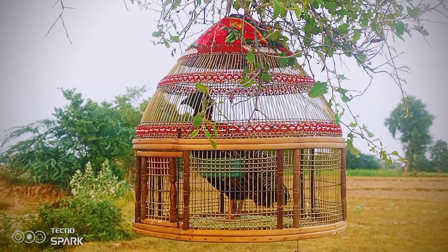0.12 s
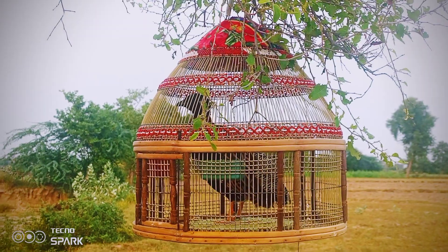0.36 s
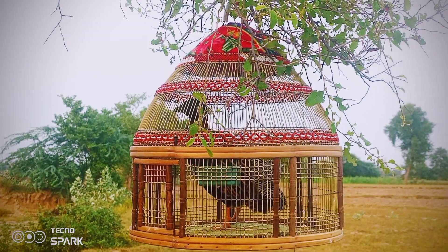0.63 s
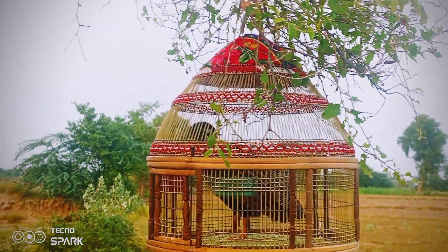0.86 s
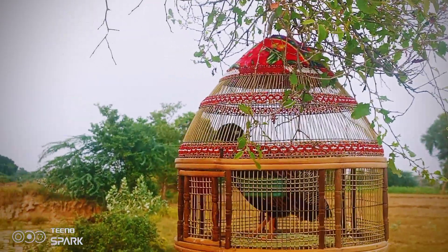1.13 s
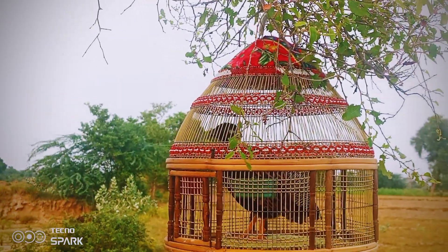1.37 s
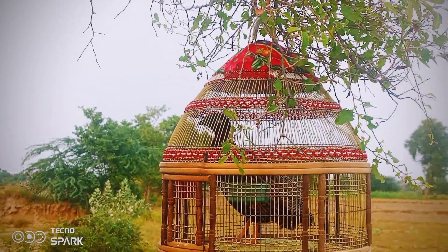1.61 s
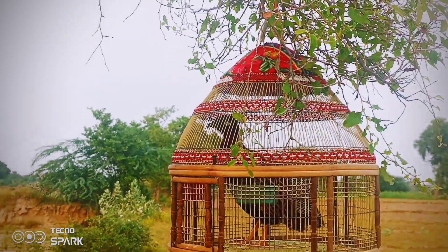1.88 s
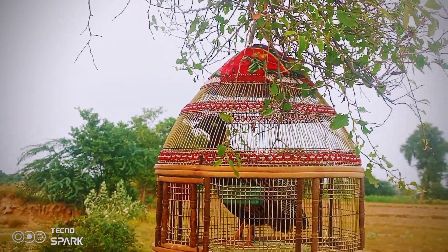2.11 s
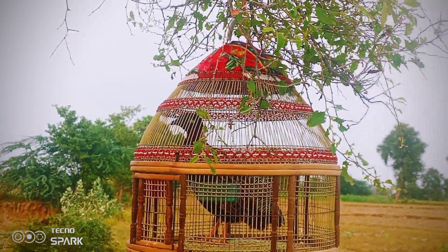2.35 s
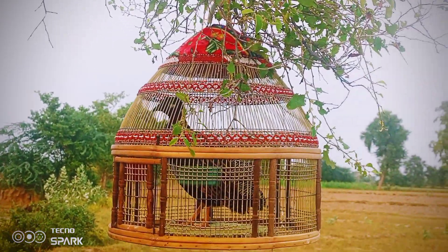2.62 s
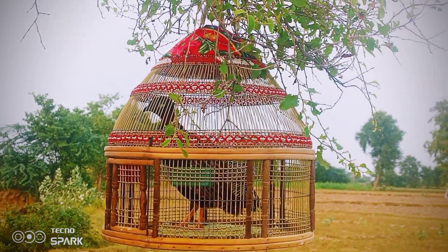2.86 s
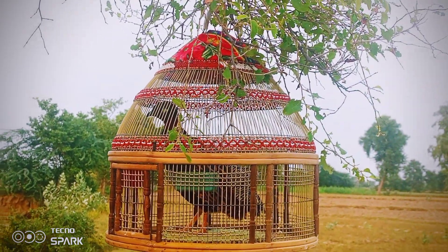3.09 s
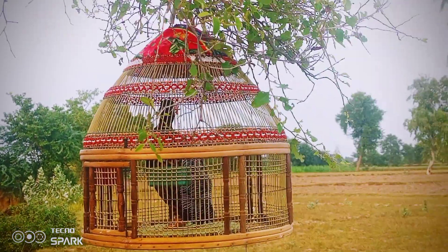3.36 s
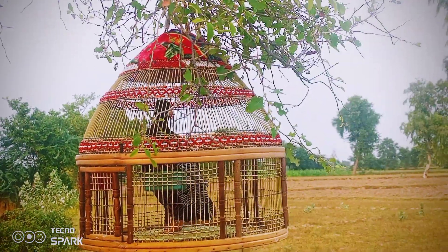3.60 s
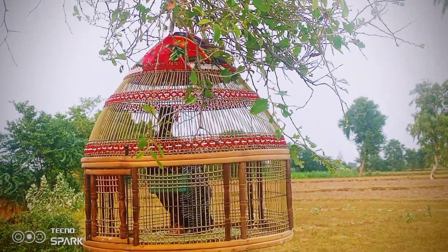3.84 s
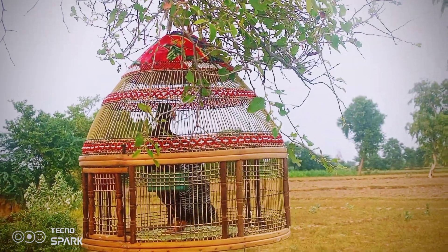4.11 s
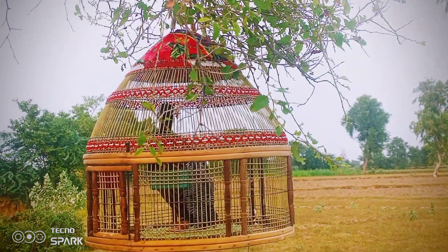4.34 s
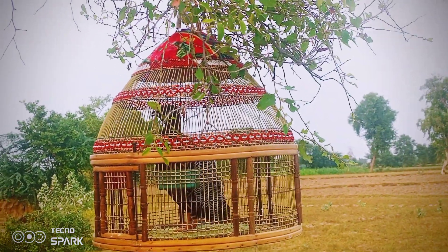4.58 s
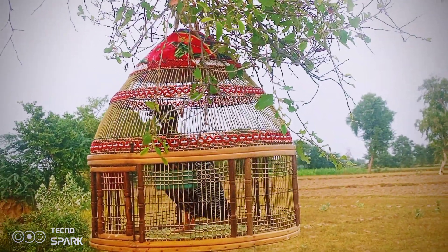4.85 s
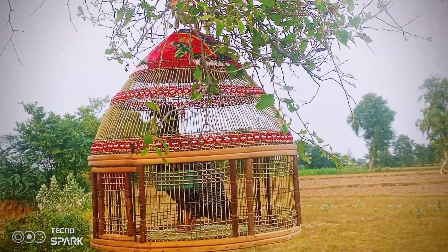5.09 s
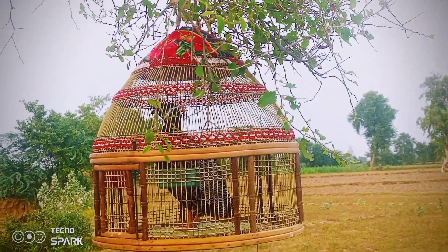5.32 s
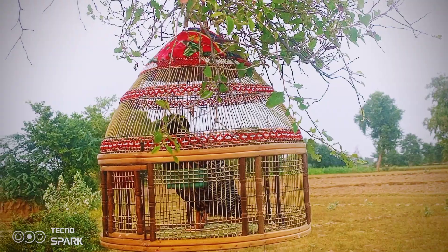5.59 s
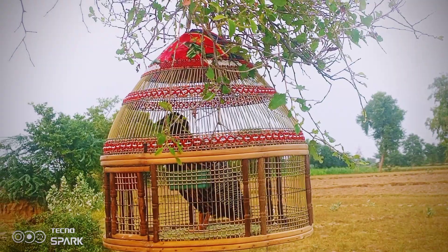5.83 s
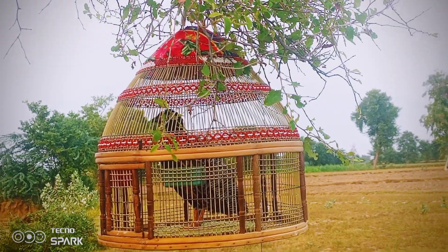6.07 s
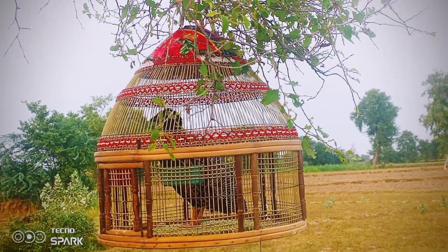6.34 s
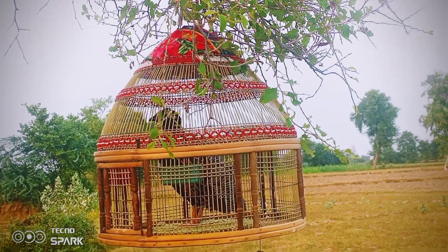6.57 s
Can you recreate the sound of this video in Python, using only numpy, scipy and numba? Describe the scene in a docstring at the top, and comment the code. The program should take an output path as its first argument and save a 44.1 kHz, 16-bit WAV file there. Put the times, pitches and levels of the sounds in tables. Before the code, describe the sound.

Open farmland, very quiet: low field hush, light wind rumble, a faint insect shimmer, distant chirps and soft dove coos. Just after three seconds a caged game bird close to the microphone gives four loud, grating notes in about one second, the second and fourth cracking into a tiny high whistle. Then the quiet returns, with a far bird repeating a hoarse falling note.

```python
"""Caged game bird in open farmland

One microphone, the caged bird close by: four loud scratchy notes, two breaking into a short whistle.
The notes are a throttled tone with snaps ringing the throat; cage, leaves and a far tree line return them.
Around them: a small rasp and ticks, faint gliding tones for distant birds, a dove's swelling coos,
and filtered noise for insects, light wind and field hush."""
import sys
import numpy as np
from scipy import signal
from scipy.fft import rfft, irfft
from scipy.io import wavfile
from scipy.ndimage import uniform_filter1d, minimum_filter1d
from numba import njit

SR = 44100
rng = np.random.default_rng(int(sys.argv[2]) if len(sys.argv) > 2 else 0)


def persist_wave(psi):
    """Save psi, clipped to +-1, as 16-bit WAV."""
    counts = np.round(np.clip(psi, -1, 1) * 32767).astype(np.int16)
    wavfile.write(sys.argv[1], SR, np.atleast_2d(counts).T)


def convert_level_to_amplitude(level_db):
    """Map a level in decibels to its linear amplitude factor."""
    exponent = np.asarray(level_db, float) / 20
    return 10 ** exponent


N = 295470

# Puffs of air through the close bird's syrinx, spectrum only, with the microphone lifting the treble above 14
# kHz: (frequency # [Hz], relative level [dB])
RASP_COLOUR = [(1500, -64), (2300, -38), (3200, -8.5), (4000, -13), (4600, -15.5), (5600, -17.5),
               (7100, -24.5), (7500, -32.5), (9900, -36.5), (11400, -43), (12000, -51.5), (13900, -52),
               (14700, -42), (15800, -41.5)]
# Band levels [dB re main tone]: the two below fade as the beak opens, the upper swells through the note
LOW_SHUT_DB, LOW_OPEN_DB, BEAK_SHUT_DB, BEAK_OPEN_DB = -6, -41, -3, -22.5
UPPER_START_DB, UPPER_END_DB, THIRD_DB, RASP_DB = -14, -4.5, -15, -2
# Throat resonances: centre and width [Hz]
LOW_HZ, LOW_WIDTH_HZ = 1600, 170
BEAK_SHUT_HZ, BEAK_OPEN_HZ, BEAK_WIDTH_HZ = 2200, 2850, 480
UPPER_START_HZ, UPPER_END_HZ, UPPER_WIDTH_HZ = 5150, 5650, 580
THIRD_HZ, THIRD_WIDTH_HZ = 4900, 250


def scratchy_note(rows):
    """A syrinx tone is throttled, strong and weak by turns; each throb snaps, rings the throat and puffs air."""
    at, (db, hz, per_s, opening), gate = piece(rows, fade_s=0.0031)
    n, opening = len(at), np.clip(opening, 0, 1)
    throb = turns(per_s * (1 + .022 * wander(40, size=n))) - .3
    strength = convert_level_to_amplitude(1.8 * np.cos(throb / 2) + .6 * wander(90, size=n))  # every other throb is weaker
    carrier = np.sin(turns(hz + 32 * wander(120, size=n)) + .4 * np.sin(throb))
    tone = (1 - .6 * np.cos(throb)) * strength * carrier

    snaps = np.diff(np.floor(throb / (2 * np.pi)), prepend=-1) * strength  # one click per throb
    breath = .035 * rng.standard_normal(n) * (1 - .4 * np.cos(throb - 1))
    beak_hz = BEAK_SHUT_HZ + (BEAK_OPEN_HZ - BEAK_SHUT_HZ) * opening
    beak = throat(snaps + breath, beak_hz, BEAK_WIDTH_HZ)
    upper = throat(snaps + 2 * breath, np.linspace(UPPER_START_HZ, UPPER_END_HZ, n), UPPER_WIDTH_HZ)
    third = throat(snaps + breath, THIRD_HZ, THIRD_WIDTH_HZ)
    low = throat(snaps + 2 * breath, LOW_HZ, LOW_WIDTH_HZ)

    rasp = np.zeros(n)
    turn = np.linspace(0, 5, n)  # six puff shapes, each fading into the next
    for k in range(6):
        shape = coloured(RASP_COLOUR, size=400) * np.hanning(400)
        puff = signal.fftconvolve(snaps + breath, shape)[150:n + 150]
        rasp += puff * np.cos(np.pi / 2 * np.clip(turn - k, -1, 1))

    beak_level = convert_level_to_amplitude(BEAK_SHUT_DB + (BEAK_OPEN_DB - BEAK_SHUT_DB) * opening)
    low_level = convert_level_to_amplitude(LOW_SHUT_DB + (LOW_OPEN_DB - LOW_SHUT_DB) * opening ** 1.1)
    below = beak_level * beak + low_level * low
    above = convert_level_to_amplitude(np.linspace(UPPER_START_DB, UPPER_END_DB, n)) * upper + convert_level_to_amplitude(THIRD_DB) * third
    return at, gate * convert_level_to_amplitude(db) * (rms_one(tone) + below + above + convert_level_to_amplitude(RASP_DB) * rms_one(rasp))


def throat(x, hz, width_hz):
    """A resonance rung twice (slow rise, dark valleys), its slow level evened out to rms 1."""
    one = np.ones(len(x))
    r = np.exp(-np.pi * width_hz / SR) * one
    c = np.cos(2 * np.pi * hz / SR) * one
    y = resonate(resonate(x, r, c), r, c)
    return y / np.sqrt(uniform_filter1d(y ** 2, size=700) + 1e-14)


@njit
def resonate(x, r, c):
    """Two-pole resonance whose centre and width move sample by sample."""
    y = np.zeros(len(x))
    for i in range(2, len(x)):
        y[i] = (1 - r[i]) * x[i] + 2 * r[i] * c[i] * y[i - 1] - r[i] ** 2 * y[i - 2]
    return y


def whistle(rows, depth, octave_db=-33):
    """The snapping stops and one clear, beating tone with a faint octave is left."""
    at, (hz, db), gate = piece(rows, fade_s=0.002)
    n = len(at)
    swing = turns(hz + 12 * wander(200, size=n))
    beat = 1 + depth * np.cos(turns(400 * (1 + .15 * wander(60, size=n))))  # about 400 beats per s
    tone = np.sin(swing) + convert_level_to_amplitude(octave_db) * np.sin(2 * swing)
    return at, np.sqrt(2) * gate * beat * convert_level_to_amplitude(db + 1.9 * wander(150, size=n)) * tone


# Scratchy notes of the close bird, in pieces:
# (time [s], main tone level [dB], main tone [Hz], throbs [per s], beak opening [0-1])
NOTES = [
    [(3.319, -28, 3070, 260, 0.6), (3.325, -20.5, 3124, 260, 0.84), (3.381, -18.5, 3248, 260, .85),
     (3.433, -17, 3455, 221, 1.0), (3.457, -22.5, 3220, 221, 0.61), (3.468, -23.5, 3380, 221, 0.21)],
    [(3.662, -26.5, 3247, 279, .0), (3.672, -21.5, 3332, 280, 0.31), (3.712, -18.5, 3071, 252, 1),
     (3.826, -20, 3262, 266, 0.63), (3.844, -20.5, 3370, 263, 0.73), (3.852, -25.5, 3520, 300, 1)],
    [(3.874, -19, 3130, 190, 0.18), (3.882, -26.5, 3370, 190, 0.3), (3.89, -25.5, 3110, 190, 0.28),
     (3.905, -30.5, 3173, 190, 0.5)],
    [(4.139, -29, 3320, 268, 0), (4.149, -21.5, 3310, 272, 0.39), (4.181, -18.5, 3218, 268, 0.9),
     (4.227, -18.5, 3125, 240, 0.99), (4.258, -25, 3340, 225, .15)],
    [(4.334, -27, 3170, 276, .0), (4.344, -19.5, 3330, 276, 0.38), (4.36, -17.5, 3255, 280, 0.7),
     (4.414, -22, 3080, 284, 0.88), (4.42, -19, 3100, 283, .45)],
    [(4.443, -21, 3110, 217, 1), (4.447, -20, 3333, 217, 0.61), (4.477, -22.5, 3226, 240, 0.35),
     (4.498, -29, 3200, 221, 0.26)],
]
# Breaks into whistling: (time [s], frequency [Hz], level [dB])
WHISTLES = [
    [(3.847, 5485, -23), (3.853, 5700, -16.5), (3.864, 5730, -16.5), (3.872, 5520, -16.5),
     (3.876, 5360, -29.5)],
    [(4.415, 5430, -24), (4.421, 5640, -19), (4.427, 6050, -23), (4.432, 5940, -21), (4.437, 5760, -20),
     (4.442, 5440, -17.5), (4.445, 5430, -27)],
]
# Beating of each whistle: depth [share of the level]
WHISTLE_BEAT_DEPTHS = [.1, .6]
CALL_EDGE_HZ = 1460


def game_bird():
    """All notes and whistle breaks of the close bird; little sounds below the low band."""
    sounds = [scratchy_note(rows) for rows in NOTES]
    sounds += [whistle(rows, depth) for rows, depth in zip(WHISTLES, WHISTLE_BEAT_DEPTHS)]
    out = np.zeros(N)
    for at, sound in sounds:
        out[at] += sound
    return signal.sosfilt(signal.ellip(5, 1, 45, CALL_EDGE_HZ, "high", fs=SR, output="sos"), out)


# Levels are the energy of each response [dB re the direct call]
SCATTER_DB, SCATTER_T60_S = -10, 0.21
ECHO_DB, ECHO_LAG_S, ECHO_SMEAR_S, ECHO_TREES_PER_S = -42.5, .21, 0.022, 400
FIELD_DB, FIELD_T60_S = -47.5, 1.0


def surroundings(x):
    """Quick scatter off cage and leaves, one smeared echo from far trees, a faint long tail over the field."""
    t = np.arange(SR) / SR
    noise = rng.standard_normal((3, SR))
    near = band(noise[0], 2600, 14000, order=1) * convert_level_to_amplitude(-60 * t / SCATTER_T60_S) * (t > .002)
    trees = noise[1] * (rng.random(SR) < ECHO_TREES_PER_S / SR)  # separate reflections
    echo = band(trees, 2500, 6235) * np.exp(-.5 * ((t - ECHO_LAG_S) / ECHO_SMEAR_S) ** 2)
    field = band(noise[2], 2100, 6400) * convert_level_to_amplitude(-60 * t / FIELD_T60_S) * np.clip(t / 0.043, 0, 1)
    response = convert_level_to_amplitude(SCATTER_DB) * unit_energy(near) + convert_level_to_amplitude(ECHO_DB) * unit_energy(echo)
    response = response + convert_level_to_amplitude(FIELD_DB) * unit_energy(field)
    return signal.fftconvolve(x, response)[:N]


# Colour of the dry rasp nearby, spectrum only: (frequency [Hz], relative level [dB])
CHURR_COLOUR = [(1060, -43), (1800, -24), (2270, 7), (2630, 7.5), (3420, -4), (3830, 7), (4680, 9),
                (5940, 3), (7000, -16), (9100, -56), (15400, -120)]
CHURR_AT_S, CHURR_HOLD_S, CHURR_DB = .555, 0.071, -65.5
CHURR_RISE_DB_PER_S, CHURR_FALL_DB_PER_S = 2100, 1650


def churr():
    """A short dry rasp nearby: coloured noise with an uneven level and steep ends."""
    at = np.arange(round((CHURR_AT_S - .015) * SR), round((CHURR_AT_S + CHURR_HOLD_S + .03) * SR))
    t = at / SR - CHURR_AT_S
    rise = CHURR_RISE_DB_PER_S * np.minimum(t, 0)
    fall = CHURR_FALL_DB_PER_S * np.maximum(t - CHURR_HOLD_S, 0)
    level = convert_level_to_amplitude(CHURR_DB + rise - fall + 4.2 * wander(120, size=len(at)))
    out = np.zeros(N)
    out[at] = level * coloured(CHURR_COLOUR, size=len(at))
    return out


# Small dry ticks: (time [s], peak level [dB], frequency [Hz])
TICKS = [(0.2, -55, 1100), (0.51, -60, 5040), (0.618, -56, 2780), (3.21, -48.5, 1590), (5.836, -60, 3700)]


def ticks():
    """Broad dry ticks: short bursts of noise that die away at once."""
    out = np.zeros(N)
    t = np.arange(400) / SR
    for s, peak_db, hz in TICKS:
        burst = rng.standard_normal(400) * convert_level_to_amplitude(-60 * t / 0.011)
        puff = band(burst, hz / 1.6, hz * 1.3, order=3)
        out[round(s * SR):][:400] += convert_level_to_amplitude(peak_db) * puff / np.abs(puff).max()
    return out


# A warbling whistle far off, at full strength: (time [s], frequency [Hz], level [dB])
WARBLE = [(0.11, 1700, -72), (0.14, 1940, -56), (0.17, 2045, -54), (0.24, 2038, -55.5),
          (0.272, 1926, -58.5), (0.328, 1964, -56), (0.376, 1815, -64), (0.41, 1920, -76)]
WARBLES_PER_S = 84


def warble(swing_hz=78.0, second_ratio=1.236, second_db=-15):
    """A tone with fast vibrato and a weaker second voice above it."""
    at, (hz, db), gate = piece(WARBLE, fade_s=0.0072)
    n = len(at)
    beat = 2 * np.pi * WARBLES_PER_S * (at - at[0]) / SR
    pitch = hz + swing_hz * np.sin(beat)
    second = np.sin(turns(second_ratio * pitch + 60. * wander(106, size=n)))
    level = convert_level_to_amplitude(db + 0.71 * np.cos(beat) + 2.0 * wander(40, size=n))
    out = np.zeros(N)
    out[at] = np.sqrt(2) * gate * level * (np.sin(turns(pitch)) + convert_level_to_amplitude(second_db) * second)
    return out


# A far bird chattering in calls of several parts: (start [s], length [s], peak level [dB])
CHATTER = [(1.133, 0.031, -68.5), (1.201, 0.025, -66.5), (1.287, 0.029, -63), (1.376, .056, -67.5),
           (1.485, .05, -67.5), (1.59, 0.052, -67), (1.709, 0.034, -66.5), (1.845, 0.049, -69)]
# Parts of one call:
# (lag [s], share of the length [1], first pitch [Hz], last pitch [Hz], level [dB re call], hoarseness [Hz])
CHATTER_PARTS = [(0.00073, 1.06, 2790, 2680, 0, 116), (.007, 1.12, 1980, 2210, -0.5, 140),
                 (.005, .95, 6080, 6060, -16.5, 150.)]
# Another far bird repeating one hoarse falling note: (start [s], peak level [dB])
CACKLE = [(5.416, -64), (5.511, -68.5), (5.601, -68), (5.711, -65.5), (5.812, -65), (5.928, -65),
          (6.051, -68.5)]
CACKLE_S, CACKLE_FIRST_HZ, CACKLE_LAST_HZ, CACKLE_HOARSE_HZ = 0.0595, 2560, 2090, 90.
# Clear far peeps: (start [s], length [s], first pitch [Hz], last pitch [Hz], peak level [dB])
PEEPS = [(.0, .092, 4700, 4400, -80), (.044, .071, 5300, 4970, -82), (.19, 0.062, 5450, 5500, -80),
         (.773, .05, 4750, 4700, -86), (.84, .065, 4600, 4470, -89), (.0, 0.074, 2300, 2270, -75),
         (0.084, 0.07, 3980, 3810, -79), (.776, 0.096, 2370, 2310, -70.5), (1.36, .046, 3920, 3720, -77),
         (1.398, 0.022, 3530, 3330, -74), (1.797, 0.049, 3700, 4300, -81), (1.995, 0.13, 4750, 5050, -82),
         (2.123, 0.068, 3780, 4150, -81), (2.334, 0.11, 1860, 1960, -75), (2.372, 0.093, 2740, 2650, -70.5),
         (2.517, 0.23, 2710, 2700, -80), (2.926, 0.12, 2680, 2460, -73), (3.21, .052, 3930, 3750, -74),
         (4.747, .06, 1920, 1960, -68.5), (5.181, 0.044, 3950, 4040, -65.5), (6.161, 0.24, 2385, 2420, -70)]
# Hoarse far chirps: (start [s], length [s], first pitch [Hz], last pitch [Hz], peak level [dB])
CHIRRUPS = [(.024, .036, 5800, 5600, -74.5), (0.48, 0.022, 6100, 5900, -67.5),
            (0.47, 0.061, 2900, 2920, -71.5), (.856, 0.26, 1810, 1820, -67.5),
            (1.287, 0.069, 5940, 5000, -77), (2.417, 0.046, 5950, 5530, -65),
            (2.444, 0.04, 5450, 5820, -63), (2.587, .053, 5800, 5830, -72),
            (3.142, .056, 1930, 2020, -66.5), (3.215, 0.025, 6000, 6000, -71),
            (5.1, 0.063, 6250, 5150, -80), (5.31, .073, 1950, 2350, -68.5), (6.347, .033, 6000, 5300, -82)]
PEEP_HOARSE_HZ, CHIRRUP_HOARSE_HZ = 35., 119.8
# Barely heard peeps at random moments
TWITTERS, TWITTER_DB, TWITTER_S, TWITTER_LOW_HZ, TWITTER_HIGH_HZ = 8, -86, .055, 3800, 5600


def far_notes():
    """Every far note: (start [s], length [s], first pitch [Hz], last pitch [Hz], peak [dB], hoarseness [Hz])."""
    notes = []
    for s, length, db in CHATTER:
        for lag, share, first_hz, last_hz, part_db, hoarse_hz in CHATTER_PARTS:
            notes.append((s + lag, length * share, first_hz, last_hz, db + part_db, hoarse_hz))
    for s, db in CACKLE:
        notes.append((s, CACKLE_S, CACKLE_FIRST_HZ, CACKLE_LAST_HZ, db, CACKLE_HOARSE_HZ))
    notes += [(*row, PEEP_HOARSE_HZ) for row in PEEPS]
    notes += [(*row, CHIRRUP_HOARSE_HZ) for row in CHIRRUPS]
    for when, high, glide in rng.random((TWITTERS, 3)):
        start = when * (N / SR - 2 * TWITTER_S)
        hz = TWITTER_LOW_HZ + (TWITTER_HIGH_HZ - TWITTER_LOW_HZ) * high
        notes.append((start, TWITTER_S, hz, hz * (.94 + .08 * glide), TWITTER_DB, PEEP_HOARSE_HZ))
    return notes


def far_birds():
    """Gliding tones; distance and hoarseness make pitch and level shake."""
    out = np.zeros(N)
    for s, length, first_hz, last_hz, db, hoarse_hz in far_notes():
        i, n = round(max(s, 0) * SR), round(length * SR)
        pitch = np.linspace(first_hz, last_hz, n) + hoarse_hz * wander(181, size=n)
        level = convert_level_to_amplitude(db + 0.82 * wander(80, size=n)) * np.sqrt(np.hanning(n))
        out[i:i + n] += level * np.sin(turns(pitch))
    return out


def far_tail(x, tail_db=-14, t60_s=0.25):
    """Far calls arrive with a dull wash of scatter behind them."""
    t = np.arange(SR // 2) / SR
    wash = band(rng.standard_normal(SR // 2), 1200, 7000, order=1) * convert_level_to_amplitude(-60 * t / t60_s)
    return x + convert_level_to_amplitude(tail_db) * signal.fftconvolve(x, unit_energy(wash))[:N]


# Coos of the dove: (middle [s], length [s], level at the top of the swell [dB])
DOVE = [(0.056, 0.1, -80), (.29, 0.074, -76.5), (0.446, 0.091, -66.5), (0.576, 0.15, -63.5),
        (0.717, 0.052, -84), (0.86, 0.12, -76), (0.978, 0.1, -65.5), (1.49, .15, -81), (1.648, 0.1, -91),
        (1.913, .18, -86), (2.93, 0.084, -87)]
DOVE_HZ = 489
DOVE_FAR_DB, DOVE_FAR_UNTIL_S = -85.5, 3  # a steady faint murmur on the same pitch


def dove():
    """Soft coos on one pitch, each a smooth swell, over a faint murmur."""
    t = np.arange(N) / SR
    level = convert_level_to_amplitude(DOVE_FAR_DB + 3. * wander(6, size=N)) * np.clip((DOVE_FAR_UNTIL_S - t) / .1, 0, 1)
    for s, length, db in DOVE:
        level = level + convert_level_to_amplitude(db) * np.cos(np.pi * np.clip((t - s) / length, -.5, .5)) ** 2
    return np.sqrt(2) * level * np.sin(turns(DOVE_HZ + 4.8 * wander(13.3, size=N)))


# Insect bouts that swell and break off: (start [s], end [s], level at the end [dB])
INSECTS = [(.3, 0.872, -85.5), (1.1, 1.853, -87.5), (2.1, 2.868, -85), (4.663, 4.98, -85.5),
           (5.2, 5.98, -90), (6.05, 6.5, -96)]
INSECT_HZ, INSECT_WIDTH_HZ = 7450, 380
INSECT_SWELL_DB, INSECT_REST_DB = 7, -101


def insects():
    """A narrow shimmering band of noise; each bout swells, then stops short."""
    t = np.arange(N) / SR
    level = convert_level_to_amplitude(INSECT_REST_DB)
    for start, end, db in INSECTS:
        gate = np.clip(np.minimum((t - start) / .1, (end - t) / 0.021), 0, 1)
        time_left = np.clip((end - t) / (end - start), 0, 1)  # share of the bout
        level = level + gate * convert_level_to_amplitude(db - INSECT_SWELL_DB * time_left)
    low_hz, high_hz = INSECT_HZ - INSECT_WIDTH_HZ / 2, INSECT_HZ + INSECT_WIDTH_HZ / 2
    hiss = band(rng.standard_normal(N), low_hz, high_hz)
    return level * convert_level_to_amplitude(2.2 * wander(30, size=N)) * rms_one(hiss)


# Wind on the microphone: (time [s], level [dB])
WIND = [(.0, -75), (.97, -72), (1.2, -74), (1.65, -76), (1.82, -73), (2.0, -77), (3.2, -76), (4.55, -77.5),
        (4.77, -66.5), (5.4, -69.5), (5.5, -80), (5.92, -74), (6.15, -80), (6.259, -69.5), (6.5, -78),
        (6.64, -64), (6.7, -73.5)]


def wind():
    """Lumpy wind noise in the bass: a low band of noise with a wandering level."""
    db = np.interp(np.arange(N) / SR, *np.transpose(WIND))
    level = convert_level_to_amplitude(db + 2.8 * wander(6.7, size=N) + 1.7 * wander(25, size=N))
    return level * rms_one(band(rng.standard_normal(N), 54.84, 150))


# Colour of the open field, spectrum only, with the microphone lifting the treble near 15.7 kHz: (frequency
# [Hz], relative # level [dB])
HUSH_COLOUR = [(15, -46.5), (25, -16), (75, -2), (119, -2.5), (413, -11), (472, -10.5), (602, -12),
               (1310, -12), (2020, -12.5), (3200, -21.5), (4540, -31), (7380, -27.5), (8220, -41),
               (9660, -44.5), (13400, -45), (15700, -31.5)]
HUSH_DB = -70.5


def hush():
    """Field hush: steady noise with a fixed spectrum."""
    return convert_level_to_amplitude(HUSH_DB) * coloured(HUSH_COLOUR, size=N)


def rms_one(x):
    """Scales to rms 1."""
    return x / np.sqrt(np.mean(x ** 2) + 1e-20)


def unit_energy(x):
    """Scales a response so that its squares sum to 1."""
    return x / np.sqrt(np.sum(x ** 2))


def piece(rows, fade_s=0.009):
    """Sample span of a table, its columns joined in time and a gate with soft ends."""
    s, *columns = np.transpose(rows)
    at = np.arange(round(s[0] * SR), min(round(s[-1] * SR), N))
    t = at / SR
    gate = np.clip(np.minimum(t - s[0], s[-1] - t) / fade_s, 0, 1)
    return at, [np.interp(t, s, column) for column in columns], gate


def wander(rate_hz, size):
    """Slow random drift of rms 1: noise through two equal one-pole lowpasses."""
    r = np.exp(-2 * np.pi * rate_hz / SR)
    drift = signal.lfilter([1], [1, -2 * r, r * r], rng.standard_normal(size + 4000))
    return rms_one(drift[4000:])


def coloured(points, size):
    """Noise with the given spectrum; rms 1."""
    hz = np.maximum(np.fft.rfftfreq(size, 1 / SR), 1)
    point_hz, point_db = np.transpose(points)
    shape = convert_level_to_amplitude(np.interp(np.log(hz), np.log(point_hz), point_db))
    return rms_one(irfft(rfft(rng.standard_normal(size)) * shape, size))


def band(x, low_hz, high_hz, order=2):
    """Butterworth bandpass."""
    return signal.sosfilt(signal.butter(order, [low_hz, high_hz], "band", fs=SR, output="sos"), x)


def turns(hz):
    """Phase [radians] of a moving frequency."""
    return 2 * np.pi * np.cumsum(hz) / SR


def scene():
    """The close bird and its reflections, then small noises, far birds, dove, insects and air."""
    bird = game_bird()
    close = bird + surroundings(bird) + churr() + ticks()
    # the warble sounds twice at half strength, once with the far tail and once without
    far = far_tail(.5 * warble() + far_birds()) + .5 * warble() + dove()
    return (close + far + insects() + wind() + hush())[None]


def low_pass(x):
    """Removes everything above the highest recorded frequency."""
    return signal.sosfilt(signal.butter(12, 16960, fs=SR, output="sos"), x)


DUCK_FROM_DB, DUCK_SLOPE, DUCK_BELOW_HZ = -44, 0.25, 1000  # slope: dB of bass cut per dB of excess
CUTOFF_HZ, CEILING = 15720, .4  # ceiling: share of full scale


def record(dry):
    """A suppressor turns the bass down while the input is loud; both ends are cut; a fast limiter holds peaks."""
    level_db = 10 * np.log10(uniform_filter1d(dry ** 2, size=1400) + 1e-12)
    bass = signal.sosfiltfilt(signal.butter(4, DUCK_BELOW_HZ, fs=SR, output="sos"), dry)
    bass_gain = convert_level_to_amplitude(-DUCK_SLOPE * np.maximum(level_db - DUCK_FROM_DB, 0))
    x = dry - bass * (1 - bass_gain)
    x = signal.sosfilt(signal.butter(2, 45, "high", fs=SR, output="sos"), x)
    x = signal.sosfilt(signal.ellip(10, .5, 60, CUTOFF_HZ, fs=SR, output="sos"), x)
    # lowest of the negated level = highest level close by
    peak = uniform_filter1d(-minimum_filter1d(-np.abs(x), size=61), size=41)
    mix = x * np.minimum(1, CEILING / (peak + 1e-9))
    return low_pass(mix)


dry = scene()
out = record(dry)
persist_wave(out)
```